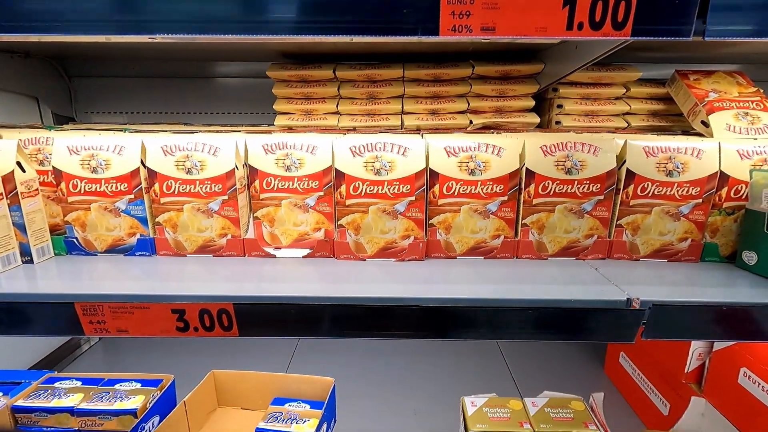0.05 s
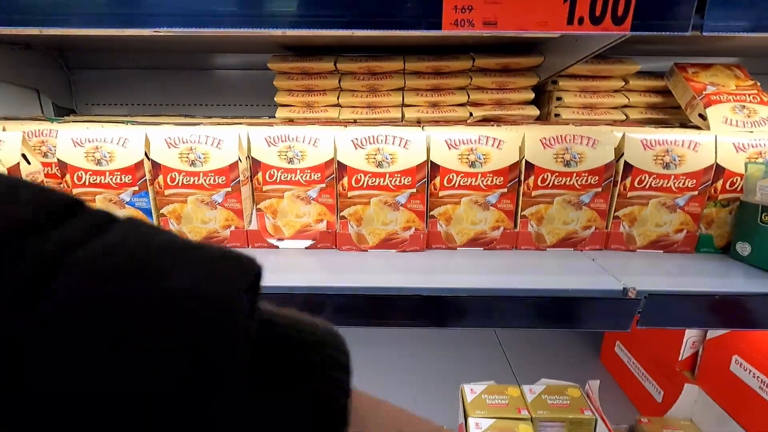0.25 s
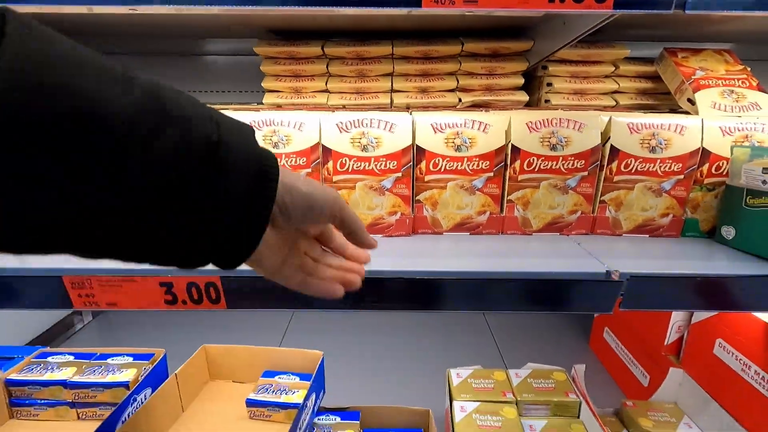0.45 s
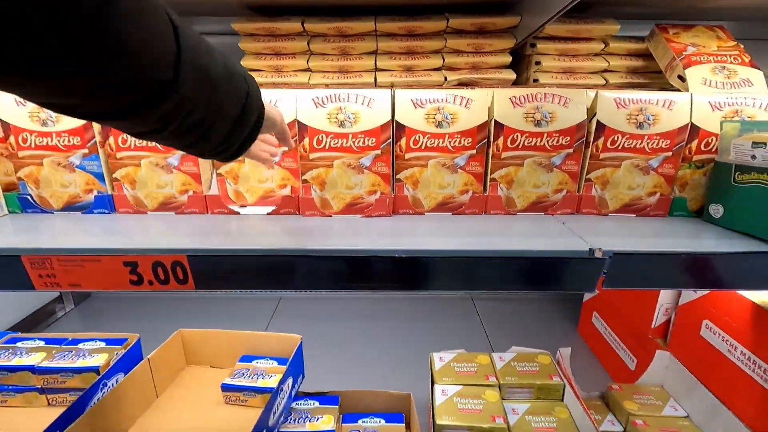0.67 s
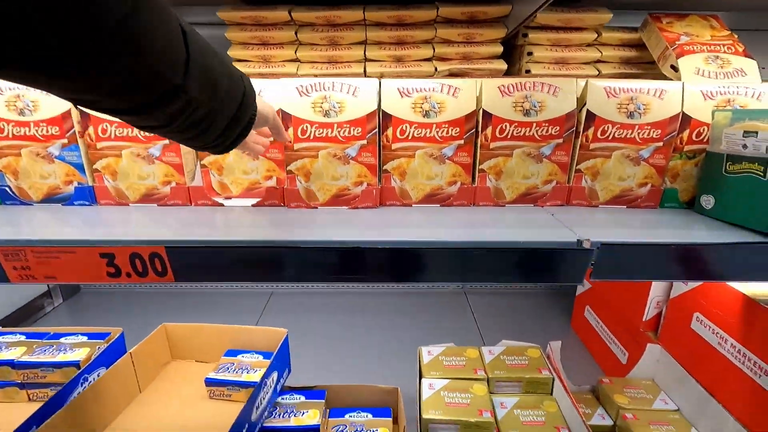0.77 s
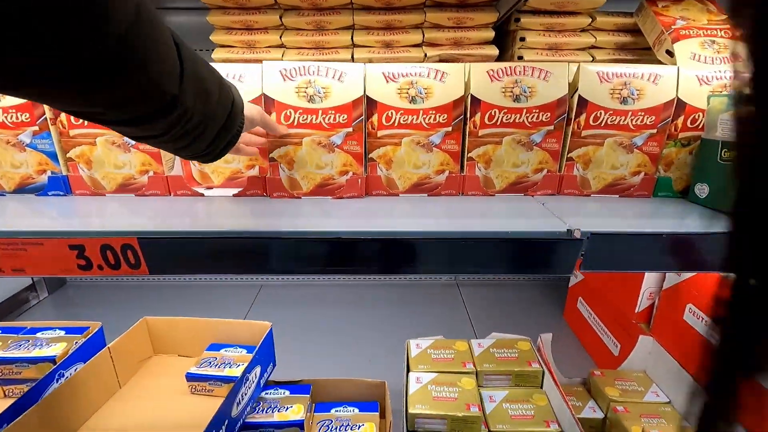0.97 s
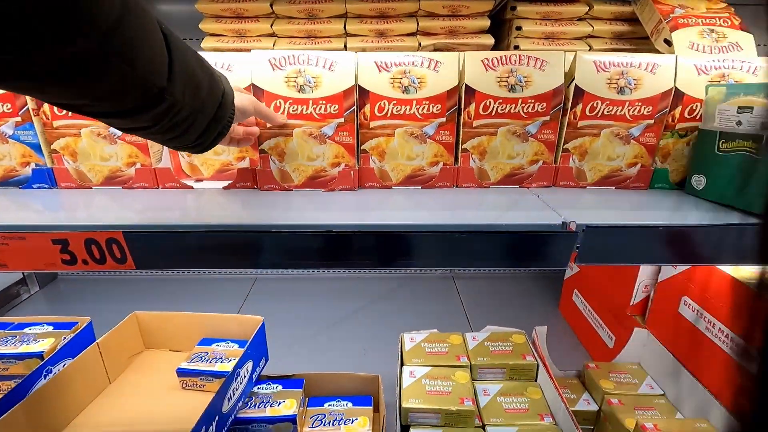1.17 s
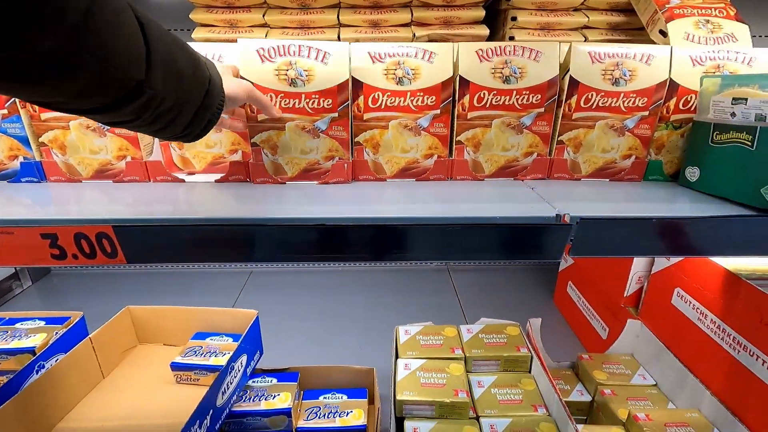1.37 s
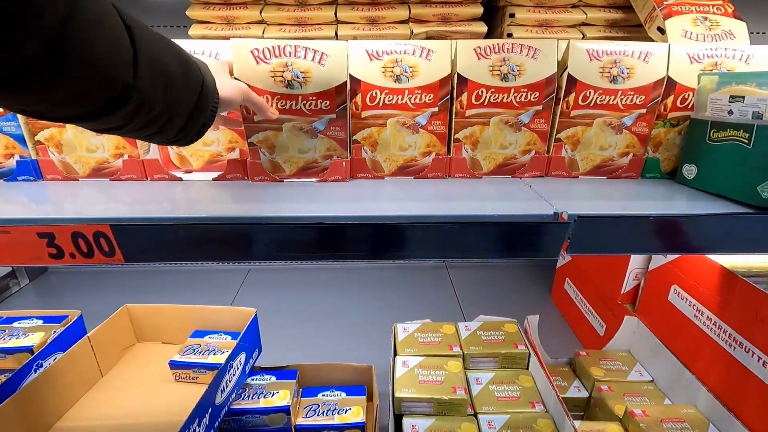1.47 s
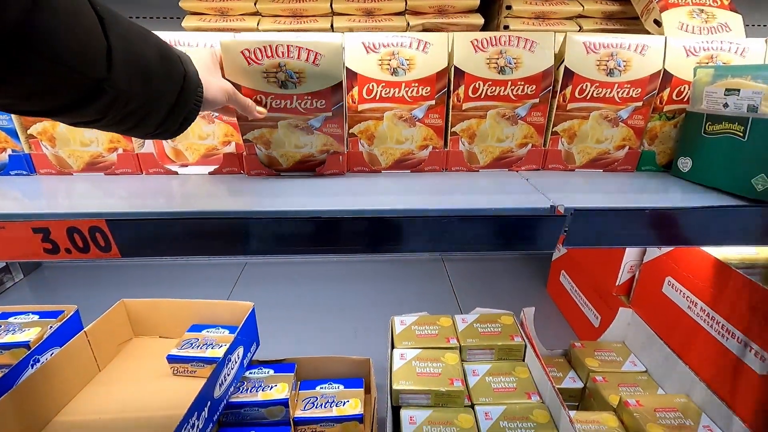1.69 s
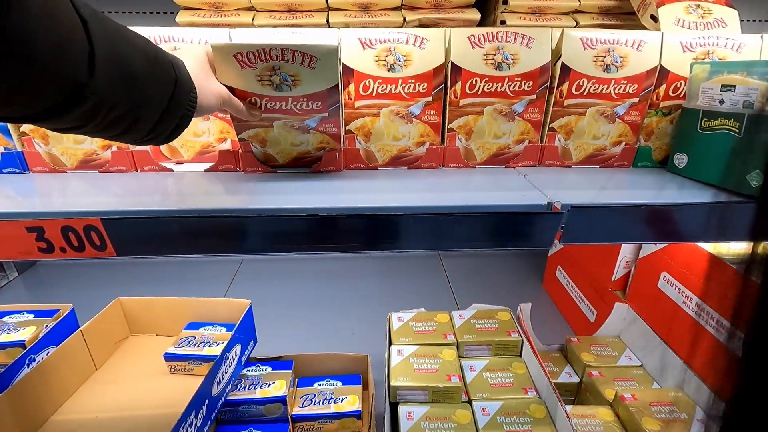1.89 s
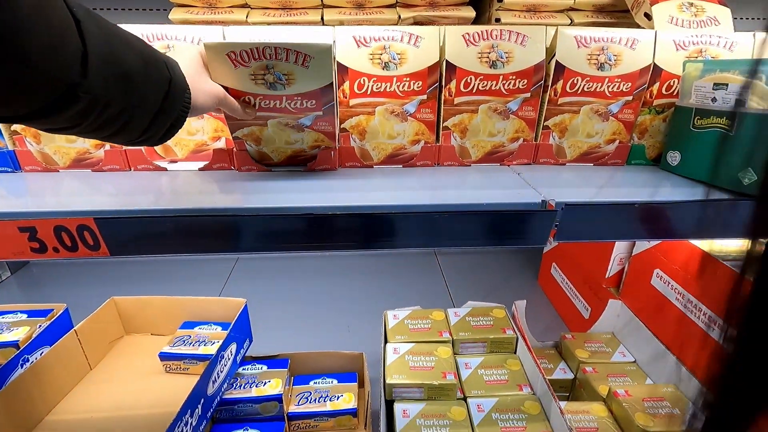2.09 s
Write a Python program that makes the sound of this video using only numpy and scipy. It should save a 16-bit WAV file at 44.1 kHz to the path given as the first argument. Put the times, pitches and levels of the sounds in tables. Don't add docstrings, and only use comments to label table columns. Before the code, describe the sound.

A refrigerated cabinet drones deep and unevenly throughout with dull airflow; early on an arm reaches from the left with brief cloth rustle and one short hard snap, then faint rubbing fades, picked up by a body-worn stereo microphone.

```python
import sys
import numpy as np
from scipy import signal
from scipy.fft import rfft, irfft
from scipy.io import wavfile
from scipy.ndimage import uniform_filter1d

SR = 44100
rng = np.random.default_rng(int(sys.argv[2]) if len(sys.argv) > 2 else 0)


def decibels_to_gain(level_db):
    exponent = np.asarray(level_db, float) / 20
    return 10 ** exponent


def store_wav(level_fs):
    pcm = np.round(np.clip(np.atleast_2d(level_fs), -1, 1) * 32767)
    wavfile.write(sys.argv[1], SR, pcm.T.astype(np.int16))


N = 94197

# f/Hz, level/dB [per Hz]
AIR_SPECTRUM = [(25, -14), (60, -2), (110, 0.5), (330, -3), (600, -11), (1150, -15.5), (2300, -30),
                (5000, -36.5)]
# f/Hz, level/dB
AIR_SIDE_SPECTRUM = [(60, -37), (150, -30), (400, -5.5), (1200, -7), (3000, -0.5), (6000, -19),
                     (10500, -17), (12500, -9)]
# f/Hz, width/Hz, level/dB
DUCT_MODES = [(320.5, 37, -40.5), (1964, 500, -57), (450.8, 10, -44)]
# t/s, length/s, f/Hz, level/dB [rms]
DUCT_BLOOMS = [(.04, 0.045, 173, -30.5), (.35, 0.049, 176, -33), (.64, 0.058, 179.2, -32.5),
               (1.05, 0.19, 219.3, -35.5), (1.12, 0.1, 178.6, -33.5), (1.5, 0.089, 217, -35)]
# t/s, length/s, f/Hz, width [share of f], level/dB
SOFT_BURSTS = [(1.17, .07, 5000, .04, -60), (.43, .02, 7300, .1, -63), (.66, .03, 6150, .03, -63),
               (.36, .16, 12100, .06, -74), (.2905, .003, 3500, .7, -41), (.26, .045, 14300, .1, -69),
               (.705, .025, 9000, .3, -68), (.658, .006, 1300, .08, -44), (1.84, .12, 1400, .4, -46),
               (.1, .15, 1300, .5, -46), (.68, .07, 3200, .4, -54), (.33, .08, 4500, .5, -56),
               (.08, .12, 8000, .3, -66), (.58, .12, 9500, .3, -68), (.9, .05, 105, .08, -34)]
# t/s, level/dB
SLEEVE_EFFORT = [(0, -63.5), (.175, -58), (.23, -42.5), (.26, -40.5), (.285, -43), (.36, -48.5),
                 (.435, -47.5), (.47, -50), (.64, -51), (.705, -45.5), (.74, -50), (.935, -53),
                 (.95, -50.5), (.965, -51.5), (1.18, -54), (1.5, -53), (1.9, -58), (2.05, -53)]
# f/Hz, level/dB [per Hz]
CLOTH_SPECTRUM = [(900, -9.5), (2000, 5), (4500, -1.5), (7800, -8), (10000, -16), (12200, -25),
                  (13500, -31.5), (15500, -36.5)]
# f/Hz, level/dB, t60/s, left-right/dB
SNAP_MODES = [(620, -23, .02, 12), (1109, -18.5, .032, 9), (1560, -19.5, .026, 6), (1986, -11.5, .027, 8),
              (2400, -25, .02, 5), (3780, -21, .014, 4), (4872, -11, .017, 0), (6700, -29, .014, 1.5),
              (7434, -27, .012, 9), (10000, -35, .014, -2)]
# lag/s, f/Hz, level/dB, t60/s
OPPOSITE_MODES = [(.0017, 225, -5, .035), (0.0064, 38, -11, .12), (0.00037, 1990, -13, 0.037),
                  (.002, 900, -16, 0.039)]
# f/Hz, level/dB [rms], t/s at which neighbours throb in step
MOTOR_TONES = [(35.81, -39, 1.0), (42.31, -37, 1.071), (48.63, -33.5, 1.071), (71.45, -42, 1.0),
               (96.56, -43, 1.0), (99.95, -31, 1.822), (107.15, -39, 1.822), (129.68, -45, 1.0)]
# t/s, f/Hz, level/dB [rms]
BLADE_TONE = [(0.0, 110.7, -22), (0.04, 107.6, -43), (0.13, 111.1, -22.5), (0.31, 111.8, -26.5),
              (0.37, 108, -37), (0.42, 105.9, -24.5), (0.52, 111.1, -26.5), (0.74, 104.1, -31),
              (1.01, 114, -25), (1.1, 110.9, -19.5), (1.16, 112.3, -31.5), (1.23, 112.6, -24),
              (1.49, 112.2, -20), (1.53, 112.2, -27), (1.84, 111.7, -18), (1.97, 113.8, -34.5),
              (2.07, 109, -23), (2.14, 110.4, -21)]
# t/s, amount [0-1]
MONO_BLEND = [(0, 0.06), (.33, 0.05), (.45, 0.13), (.8, 0.29), (1.2, 0.45), (1.6, 0.59), (1.8, 0.53),
              (2.0, 0.41), (2.14, 0.32)]
# f/Hz, level/dB
MONO_LOSS = [(100, -190), (400, -130), (1200, -73), (3000, -47.5), (5600, -60), (8000, -70), (11300, -64)]

AIR_DB, AIR_TOP_DB_PER_OCT = -27, -21.5
AIR_SWELL_DB, AIR_FLICKER_DB = .4, 1.27
TURN_AWAY_DB_PER_S, TURN_ABOVE_HZ = -2.1, 1900
CLOTH_GRAINS_PER_S, CLOTH_SCATTER_DB, CLOTH_FLICKER_DB = 11000, 0.37, .6
CLOTH_LEFT_DB, CLOTH_LAG_S, CLOTH_ALIKE = 7.5, .00004, 0.65
RUMBLE_DB, RUMBLE_HZ = 13, 150
SNAP_S, SNAP_LAG_S, SNAP_RISE_S = .2871, .00002, .0022
BODY_LAG_S, BODY_TOP_HZ = .0017, 1800
MOTORS_DB, WOBBLE_DB, WOBBLE_RAD = 0.26, .5, .08
BLADE_STEP_S = 1.822
PORT_LAG_S = .00003
NOTCH_HZ, NOTCH_DB, NOTCH_WIDTH_HZ = 11150, -2.5, 360
HISS_DB, HISS_HZ, TOP_HZ = -98, 11600, 15700


def curve(table, t):
    return np.interp(t, *np.array(table, float).T)


def colour(table, hz):
    f, db = np.array(table, float).T
    return np.interp(np.log(np.maximum(hz, 1)), np.log(f), db)


def level(x, db):
    return x * decibels_to_gain(db) / np.sqrt(np.mean(x ** 2))


def walk(rate):
    hold = int(SR / rate)
    steps = np.repeat(rng.standard_normal(N // hold + 1), hold)
    slewed = uniform_filter1d(uniform_filter1d(steps, hold), hold)
    return 1.25 * slewed[:N]


def shape(x, gain):
    size = 2 * N
    mirrored = np.concatenate([x, x[..., ::-1]], axis=-1)
    spectrum = rfft(mirrored) * gain(np.fft.rfftfreq(size, 1 / SR))
    return irfft(spectrum, size)[..., :N]


def bands(x):
    for hz in 22 * 2 ** (np.arange(20) / 2):
        def window(f):
            octaves = np.log2(np.maximum(f, 1) / hz)
            return np.cos(np.pi * np.clip(octaves, -.5, .5)) ** 2
        yield hz, shape(x, window)


def late(x, lag_s):
    return shape(x, lambda f: np.exp(-2j * np.pi * f * lag_s))


def air():
    top = AIR_SPECTRUM[-1][0]

    def gain(f):
        return decibels_to_gain(colour(AIR_SPECTRUM, f) + AIR_TOP_DB_PER_OCT * np.log2(np.maximum(f / top, 1)))

    noise = shape(rng.standard_normal((2, N)), gain)
    swell = AIR_SWELL_DB * walk(1.4)
    fade = TURN_AWAY_DB_PER_S * (np.arange(N) - N / 2) / SR
    rush = 0
    for hz, part in bands(noise):
        rush = rush + decibels_to_gain(swell + fade * (hz > TURN_ABOVE_HZ) + AIR_FLICKER_DB * walk(3.3)) * part
    rush = rush * decibels_to_gain(AIR_DB) / np.std(rush[0])
    duct = 0
    for hz, width, db in DUCT_MODES:
        resonance = shape(rng.standard_normal(N), lambda f: 1 / (1 + (2 * (f - hz) / width) ** 2))
        duct = duct + level(resonance, db)
    return rush[0] + duct, shape(rush[1], lambda f: decibels_to_gain(colour(AIR_SIDE_SPECTRUM, f)))


def blooms(t):
    total = 0
    for at, length, hz, db in DUCT_BLOOMS:
        swell = decibels_to_gain(db) * np.sqrt(2) * np.exp(-((t - at) / length) ** 2)
        total = total + swell * np.cos(2 * np.pi * hz * (t - at))
    return total


def brush(t):
    rubs = 0
    for at, length, hz, wide, db in SOFT_BURSTS:
        squeak = shape(rng.standard_normal(N), lambda f: 1 / (1 + ((f - hz) / (wide * hz)) ** 2))
        rubs = rubs + decibels_to_gain(db) * np.exp(-((t - at) / length) ** 2) * level(squeak, 0)
    return np.array([rubs, decibels_to_gain(-CLOTH_LEFT_DB) * rubs]) * decibels_to_gain(CLOTH_LEFT_DB / 2)


def sleeve(t):
    size = decibels_to_gain(CLOTH_SCATTER_DB * rng.exponential(size=(2, N))) * rng.standard_normal((2, N))
    ticks = size * (rng.random((2, N)) < CLOTH_GRAINS_PER_S / SR)
    effort = decibels_to_gain(curve(SLEEVE_EFFORT, t) + CLOTH_FLICKER_DB * walk(30))
    rub = level(shape(ticks, lambda f: decibels_to_gain(colour(CLOTH_SPECTRUM, f))), 0) * effort
    right = CLOTH_ALIKE * late(rub[0], CLOTH_LAG_S) + np.sqrt(1 - CLOTH_ALIKE ** 2) * rub[1]
    rumble = shape(rng.standard_normal((2, N)), lambda f: 1 / (1 + (f / RUMBLE_HZ) ** 2))
    stir = level(rumble, RUMBLE_DB) * effort
    return np.array([rub[0], decibels_to_gain(-CLOTH_LEFT_DB) * right]) * decibels_to_gain(CLOTH_LEFT_DB / 2) + stir


def snap(t):
    def ring(lag, hz, db, t60):
        age = np.maximum(t - SNAP_S - lag, 0)
        decay = decibels_to_gain(db - 60 * np.minimum(age / t60, 4))
        rise = 1 - np.exp(-(age / SNAP_RISE_S) ** 2)
        return decay * rise * np.sin(2 * np.pi * hz * age)

    def port(lag, share):
        total = 0
        for hz, db, t60, pan_db in SNAP_MODES:
            total = total + ring(lag + BODY_LAG_S * (hz < BODY_TOP_HZ), hz, db + share * pan_db, t60)
        return total

    jolt = -sum(ring(lag, hz, db, t60) for lag, hz, db, t60 in OPPOSITE_MODES)
    return np.array([port(0, .5) + jolt, port(SNAP_LAG_S, -.5) - jolt])


def fans(t):
    total = 0
    for hz, db, step in MOTOR_TONES:
        size = decibels_to_gain(db + MOTORS_DB + WOBBLE_DB * walk(1.2)) * np.sqrt(2)
        total = total + size * np.cos(2 * np.pi * hz * (t - step) + WOBBLE_RAD * walk(1.7))
    at, hz, db = np.array(BLADE_TONE, float).T
    turns = np.cumsum(np.interp(t, at, hz)) / SR
    turns = turns - np.interp(BLADE_STEP_S, t, turns)
    blade = decibels_to_gain(np.interp(t, at, db)) * np.sqrt(2) * np.cos(2 * np.pi * turns)
    return total + blade


def scene():
    t = np.arange(N) / SR
    mid, side = air()
    mid = mid + blooms(t) + fans(t)
    cabinet = np.array([late(mid, PORT_LAG_S) + side, late(mid, -PORT_LAG_S) - side])
    return cabinet + brush(t) + sleeve(t) + snap(t)


def top_cut(x):
    return signal.sosfilt(signal.butter(12, 15710, fs=SR, output="sos"), x)


def record(dry):
    blend = np.clip(curve(MONO_BLEND, np.arange(N) / SR), 0, 1)
    dry = shape(dry, lambda f: decibels_to_gain(NOTCH_DB * np.exp(-((f - NOTCH_HZ) / NOTCH_WIDTH_HZ) ** 2)))
    mid, side = (dry[0] + dry[1]) / 2, (dry[0] - dry[1]) / 2
    top = shape(side, lambda f: f > HISS_HZ)
    narrowed = top
    for hz, part in bands(side - top):
        narrowed = narrowed + decibels_to_gain(blend * colour(MONO_LOSS, hz)) * part
    noise = rng.standard_normal((2, N))
    hiss = level(shape(noise, lambda f: (f > HISS_HZ) * (HISS_HZ / np.maximum(f, 1)) ** 4), HISS_DB)
    mix = np.array([mid + narrowed, mid - narrowed]) + hiss
    mix = shape(mix, lambda f: f < TOP_HZ)
    return top_cut(mix)


dry = scene()
out = record(dry)
store_wav(out)
```